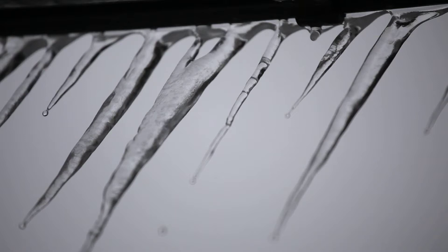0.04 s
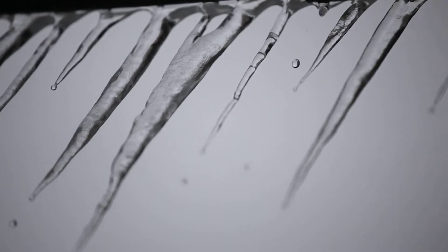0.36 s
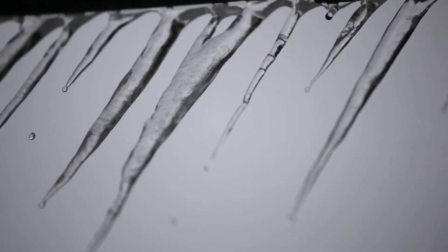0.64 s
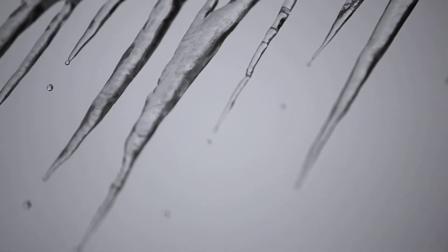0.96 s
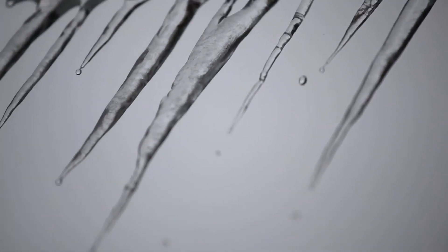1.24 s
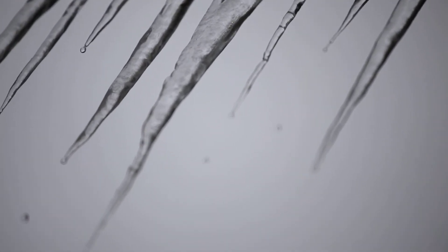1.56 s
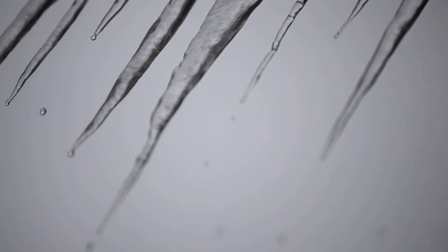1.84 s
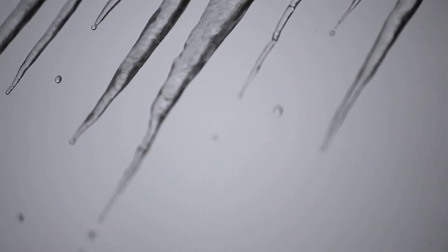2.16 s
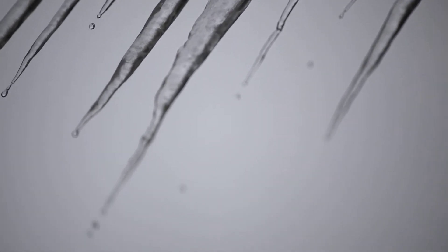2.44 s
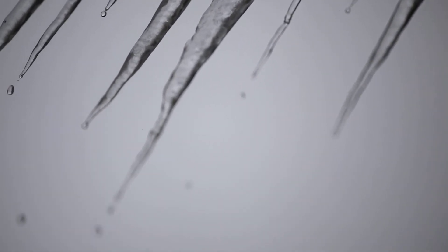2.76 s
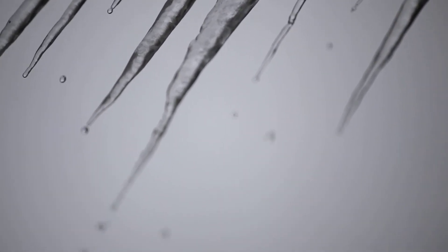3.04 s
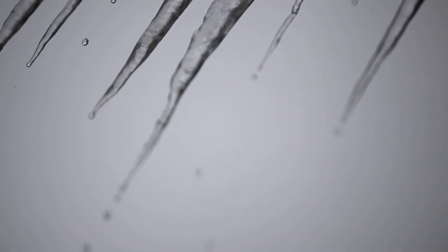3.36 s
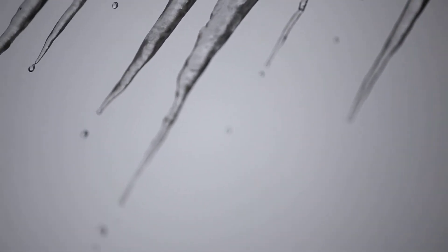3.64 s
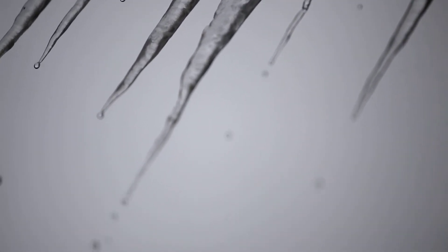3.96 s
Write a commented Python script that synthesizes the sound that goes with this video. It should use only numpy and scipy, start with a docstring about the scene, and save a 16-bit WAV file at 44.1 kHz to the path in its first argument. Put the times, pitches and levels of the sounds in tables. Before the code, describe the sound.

Small birds chirp irregularly, near and far, in a yard between houses, each chirp leaving a short echo. Meltwater from icicles ticks lightly on the ground near the fixed microphone, over a steady rumble of distant traffic.

```python
"""A thaw in a yard between houses, from one fixed microphone. After an instant of silence the low
rumble of distant traffic is there, with soft hiss and a faint whine. Almost at once sparrow-like birds
chirp near and far, and the walls smear each chirp into a tail. Then meltwater from the icicles ticks
on the ground close by, fainter along the eaves. Birds and drips carry on as the rumble eases a little."""
import sys
import numpy as np
from scipy import signal
from scipy.fft import rfft, irfft
from scipy.io import wavfile

SR = 44100
rng = np.random.default_rng(int(sys.argv[2]) if len(sys.argv) > 2 else 0)


def digitize_waveform(pressure):
    """Quantize a signal to 16-bit integers and store it at the path in sys.argv[1].

    Rows of a 2-D input are taken as channels; values are limited to [-1, 1].
    """
    field = np.atleast_2d(pressure).T
    bounded = np.clip(field, -1, 1)
    quanta = np.round(bounded * 32767).astype(np.int16)
    wavfile.write(sys.argv[1], SR, quanta)


N = 176400
TIME = np.arange(N) / SR

# spectrum of distant traffic and open air: (frequency [Hz], relative level [dB])
AIR_SPECTRUM = [(22, -18), (33, -14.5), (48, -12.5), (72, 1.5), (92, -6), (125, 1), (170, -10.5),
                (240, -10), (320, -14), (560, -13.5), (760, -19.5), (1000, -18.5), (2100, -26), (3400, -20),
                (5200, -25.5), (7000, -31.5), (9500, -41.5), (15500, -47)]
# drones in the traffic: (frequency [Hz], width [Hz], level [dB])
TRAFFIC_DRONES = [(74.1, 10, -52.5), (111.9, 4.8, -47), (144.9, 12.2, -48), (206.8, 6.4, -54),
                  (247.5, 12.7, -59.5), (542, 6.4, -65.5), (597.6, 8.8, -59.5), (874, 29, -58)]
# slow rise and fall of the rumble: (time [s], gain [dB])
RUMBLE_SWELL = [(.1, 0.5), (.42, -0.5), (.62, 1.5), (1.3, 0.9), (1.75, 0.4), (2.3, -0.3), (2.55, -1.3),
                (2.85, -2), (3.2, -1.5), (3.55, -4), (4, -2)]
# faint steady whine: (frequency [Hz], level [dB])
WHINE_TONES = [(6837, -71.5), (8791, -82), (10740, -91), (12694, -85)]
# bird notes: (time [s], length [s], first pitch [Hz], middle pitch [Hz], last pitch [Hz],
# level at the walls [dB], gain of the direct path [dB], rasp against tone [dB])
CHIRPS = [ (0.103, 0.035, 4400, 5240, 5900, -36, -6, 15), (.108, 0.047, 2350, 2876, 3350, -41, 1.5, -5),
          (0.141, 0.06, 3623, 3727, 3170, -32.5, -2, -4), (.188, 0.053, 3417, 3093, 2400, -35, 2.5, -4.5),
          (0.346, 0.051, 5600, 5240, 5130, -38.5, -7, -12), (.350, .090, 4200, 3730, 2900, -42.5, -1, 5),
          (0.401, .045, 5030, 5520, 5600, -42.5, 2, -15), (.440, 0.036, 5800, 5670, 5350, -46, 3, -11),
          (.482, 0.02, 4990, 5650, 6000, -39, -1, 2), (0.51, .036, 5440, 5400, 5200, -51, 3, -8),
          (0.596, 0.057, 4300, 3500, 2800, -46.5, -8, -8),
          (0.651, 0.054, 2920, 3150, 3350, -48.5, 2.5, -17), (.735, 0.053, 3200, 3200, 3080, -51, 4, -16),
          (0.867, 0.063, 4600, 5160, 5070, -35.5, -1, -15), (0.879, 0.049, 5900, 5630, 3800, -40.5, -1, 16),
          (.880, 0.064, 4000, 4237, 4010, -30, -10, 1), (0.904, 0.024, 2590, 3230, 3700, -39, -1, -8),
          (0.906, 0.06, 3647, 3765, 3360, -28.5, -1.5, -18),
          (.946, 0.059, 3486, 2945, 2450, -33.5, -1, -8.5), (1.262, 0.078, 5400, 5030, 4900, -46.5, 0.5, 4),
          (1.310, 0.088, 4300, 3660, 3140, -42, -0.5, 2), (1.367, 0.077, 7200, 7300, 7260, -54, -4, -5),
          (1.495, 0.046, 2070, 2406, 2070, -48, 5.5, -4), (1.531, 0.043, 3574, 3090, 2920, -36, 1, 0),
          (1.675, .036, 3080, 3520, 3500, -39.5, 3, -10), (1.721, 0.037, 3296, 3500, 2950, -37, -1, 2),
          (1.77, 0.056, 2744, 2967, 2820, -41, 1, -14), (1.901, 0.075, 4100, 3930, 3700, -42, -2, 3),
          (1.967, 0.056, 3800, 3650, 3420, -43, 6.5, -17),
          (2.008, 0.071, 3380, 2920, 2640, -38.5, 3.5, -14), (2.376, 0.046, 5840, 5640, 6100, -44, 0.5, 14),
          (2.397, .072, 3620, 3714, 3756, -34, 1.5, -5), (2.827, 0.035, 4295, 3800, 3110, -40, 0, -4),
          (2.868, 0.045, 2404, 2930, 2850, -43, 0.5, -1), (2.996, 0.043, 4240, 3990, 3490, -42.5, 0.5, 1),
          (3.032, 0.051, 3500, 3080, 2940, -37, -3.5, -9), (3.284, 0.038, 4800, 5300, 5250, -35, -3, 4),
          (3.301, .022, 2730, 3640, 4050, -34, -4, -4), (3.316, 0.06, 4028, 3703, 3370, -29, -7, -1),
          (3.34, 0.047, 3500, 3088, 2650, -30, -2, -10.5), (3.809, 0.034, 4960, 5610, 5530, -37, -6, 0),
          (3.841, .048, 4900, 4720, 4700, -38, -1, 0), (3.897, 0.044, 4800, 4170, 3420, -33, -8, 16),
          (3.917, .060, 5300, 5000, 4230, -41, -1, -3)]
# reflections off the house walls: (delay [s], gain [dB])
WALL_ECHOES = [(.0085, -14.5), (.021, -17.5), (.044, -14), (.085, -16)]
# drops landing near the microphone: (time [s], level [dB], splash centre [Hz])
NEAR_DRIPS = [(.177, -35.5, 6140), (.353, -38, 5500), (.636, -39, 5400), (.696, -37, 6000),
              (.704, -50, 5500), (.781, -41, 6500), (1.134, -43, 6700), (1.474, -30, 4020),
              (1.546, -37.5, 5250), (1.643, -36.5, 5000), (1.714, -35.5, 2000), (1.887, -36, 4900),
              (1.895, -31.5, 5100), (2.259, -43, 7100), (2.266, -36, 6600), (2.553, -39.5, 7450),
              (2.559, -31.5, 5900), (2.578, -41, 6500), (2.590, -41, 4500), (2.609, -30, 4500),
              (2.675, -39, 7300), (2.681, -36.5, 6860), (3.544, -34.5, 4600), (3.621, -40.5, 9600),
              (3.627, -33, 5200), (3.656, -43, 8150), (3.874, -38, 5800), (3.889, -32.5, 1800)]


def amp(db):
    """Decibels to gain."""
    return 10 ** (np.asarray(db) / 20)


def unit(x):
    """Scale to rms 1."""
    return x / np.sqrt(np.mean(x ** 2) + 1e-20)


def lowpass(x, hz, order=2):
    """Take the top off."""
    return signal.sosfilt(signal.butter(order, hz, fs=SR, output="sos"), x)


def wander(hz):
    """Smooth random motion up to a given rate, rms 1."""
    return unit(lowpass(rng.standard_normal(N), hz))


def resonate(x, hz, width_hz):
    """One resonance with gain 1 at its peak."""
    r = np.exp(-np.pi * width_hz / SR)
    feedback = [1, -2 * r * np.cos(2 * np.pi * hz / SR), r * r]
    return signal.lfilter(np.array([1, 0, -1]) * (1 - r * r) / 2, feedback, x)


def add(track, start_s, sound):
    """Mix a sound into a track at a given time."""
    i = int(start_s * SR)
    track[i:i + len(sound)] += sound[:max(N - i, 0)]


def distant_traffic():
    """Traffic far beyond the houses blurs into a droning, slowly swelling rumble under soft hiss."""
    air_hz, air_db = np.transpose(AIR_SPECTRUM)
    bin_hz = np.arange(N // 2 + 1) * SR / N
    colour = amp(np.interp(np.log(bin_hz + 1), np.log(air_hz), air_db))
    air = unit(irfft(rfft(rng.standard_normal(N)) * colour, N))
    air *= amp(-39.5 + 0.81 * wander(hz=7.7))
    for hz, width_hz, db in TRAFFIC_DRONES:
        phase = 2 * np.pi * hz * TIME
        air += amp(db) * (wander(width_hz) * np.cos(phase) + wander(width_hz) * np.sin(phase))
    rumble = signal.sosfiltfilt(signal.butter(2, 288, fs=SR, output="sos"), air)
    swell_db = np.interp(TIME, *np.transpose(RUMBLE_SWELL))
    return air + rumble * (amp(swell_db) - 1)   # only the low end follows the swell


def whine():
    """A few steady high tones, barely reaching the microphone."""
    return sum(amp(db) * np.sqrt(2) * np.sin(2 * np.pi * hz * TIME) for hz, db in WHINE_TONES)


def rasp_noise():
    """Roughness in a bird's voice: gives its tone close sidebands and a weaker, wide skirt."""
    return unit(wander(hz=600) + 0.29 * wander(hz=1800))


def birds():
    """Wavering whistles, some rasping; returns the sound straight to the microphone and to the walls."""
    attack_share, release_share, overtone_db = 0.24, 0.51, -20.5
    waver = 1 + 0.016 * wander(hz=128)
    flutter_db = 2.5 * wander(hz=88)
    rasp = (rasp_noise() + 1j * rasp_noise()) / np.sqrt(2)
    direct, to_walls = np.zeros(N), np.zeros(N)
    for start_s, length_s, first, middle, last, db, direct_db, rasp_db in CHIRPS:
        span = np.arange(int(start_s * SR), min(int((start_s + length_s) * SR), N))
        u = np.linspace(0, 1, len(span))   # progress through the note
        # one arch through the three pitches
        hz = first * (1 - u) * (1 - 2 * u) + middle * 4 * u * (1 - u) + last * u * (2 * u - 1)
        tone = np.exp(2j * np.pi * np.cumsum(hz * waver[span]) / SR)
        roughness = (1 + amp(rasp_db) * rasp[span]) / np.hypot(1, amp(rasp_db))
        voice = ((tone + amp(overtone_db) * tone ** 2) * roughness).real
        ramp = np.clip(np.minimum(u / attack_share, (1 - u) / release_share), 0, 1)
        note = voice * np.sin(np.pi / 2 * ramp) * amp(db + flutter_db[span])
        add(to_walls, start_s, note)
        add(direct, start_s, note * amp(direct_db))
    return lowpass([direct, to_walls], hz=7840, order=4)   # the air takes the top off the calls


def scatter(db, t60_s, build_s):
    """Diffuse reflections that build up, then die away."""
    envelope = np.exp(-np.log(1000) * TIME / t60_s) * (1 - np.exp(-TIME / build_s))
    return amp(db) / np.sqrt(N) * unit(rng.standard_normal(N) * envelope)


def yard(sound):
    """What the walls return to the microphone: quick nearby scatter, a few echoes, a duller tail."""
    early = scatter(db=-4, t60_s=0.21, build_s=0.01)
    tail = scatter(db=-5, t60_s=0.84, build_s=0.022)
    response = early + lowpass(tail, hz=6040)
    for delay_s, db in WALL_ECHOES:
        response[int(delay_s * SR)] += amp(db)
    return signal.fftconvolve(sound, response)[:N]


def splash(hz):
    """A drop bursts on the ground: a few milliseconds of spray around one pitch."""
    width_hz, spray_db, decay_s = 0.43 * hz, -22, 0.0026
    spray = rng.standard_normal(2048)
    body = unit(resonate(resonate(spray, hz, width_hz), hz, width_hz))
    return (body + amp(spray_db) * spray) * np.exp(-TIME[:len(spray)] / decay_s)


def patter(per_s, loudest_db, centre_hz):
    """Faint drops landing at random, spread over an octave and 10 dB."""
    drops = np.zeros(N)
    draws = rng.random((200, 4))
    for chance, when, size, pitch in draws:
        drop = splash(centre_hz * 2 ** (pitch - 0.5))
        if chance < per_s * N / SR / len(draws):
            add(drops, when * N / SR, amp(loudest_db + 10 * (size - 1)) * drop)
    return drops


def meltwater():
    """Icicles drip close to the microphone and further along the eaves, with tiny splash droplets."""
    near = np.zeros(N)
    for start_s, db, hz in NEAR_DRIPS:
        add(near, start_s, amp(db) * splash(hz))
    along_eaves = patter(per_s=23, loudest_db=-42.5, centre_hz=4530)
    droplets = patter(per_s=12, loudest_db=-49.5, centre_hz=7500)
    return lowpass(near + along_eaves + droplets, hz=10300)


def scene():
    """Birds and drips reach the microphone directly and off the walls, over the far traffic."""
    background = distant_traffic() + whine()
    birds_direct, birds_to_walls = birds()
    drips = meltwater()
    reflections = yard(birds_to_walls + amp(-1) * drips)
    return (background + birds_direct + drips + reflections)[None]


def record(dry):
    """The microphone opens after an instant of silence; the highest treble is cut."""
    start_s, cutoff_hz = 0.072, 15800
    opened = dry * (TIME >= start_s)
    passband = np.arange(N + 1) * SR / (2 * N) < cutoff_hz
    return irfft(rfft(opened, 2 * N) * passband)[:, :N]


dry = scene()
out = record(dry)
digitize_waveform(out)
```